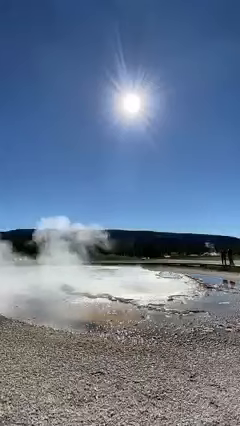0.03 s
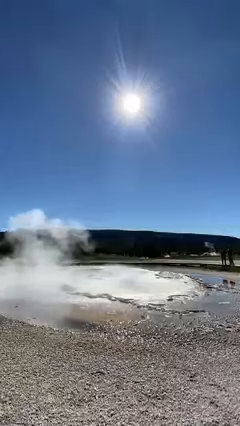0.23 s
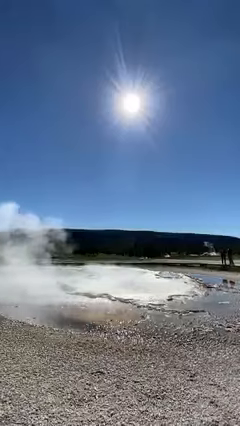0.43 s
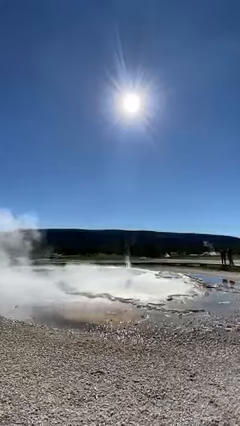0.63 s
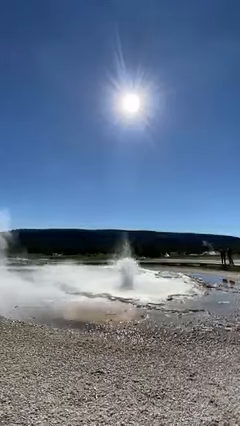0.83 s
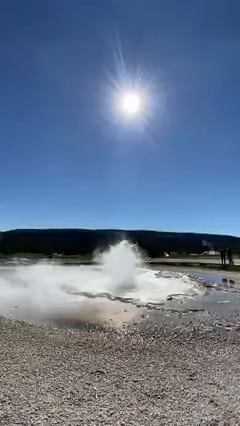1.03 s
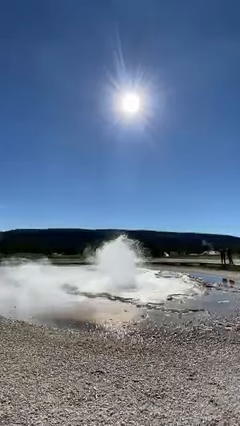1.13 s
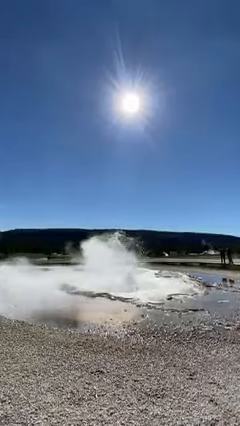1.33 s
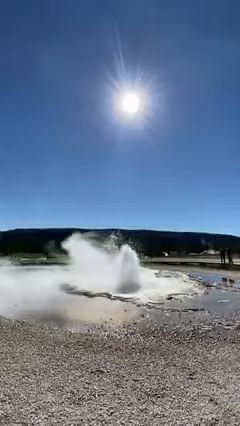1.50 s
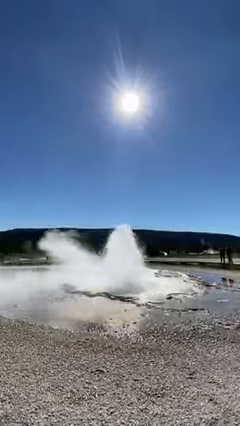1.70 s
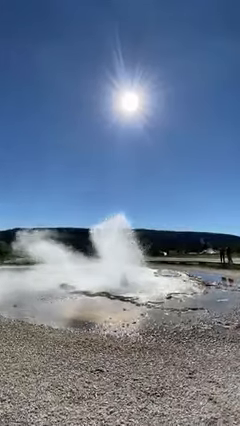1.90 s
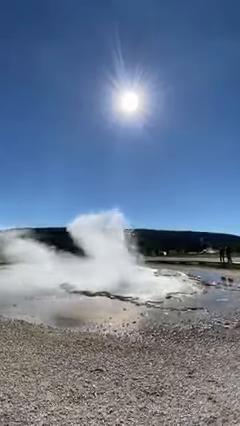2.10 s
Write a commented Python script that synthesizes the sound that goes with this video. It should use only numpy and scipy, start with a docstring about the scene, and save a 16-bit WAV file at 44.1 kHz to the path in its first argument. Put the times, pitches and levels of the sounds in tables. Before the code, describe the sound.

A small geyser erupts with splashing, hissing water while gusty wind buffets the microphone

```python
"""After a short silence the sound starts abruptly: gusty wind on the microphone ports, with a far hiss behind it.
The wind is lumpy low noise in three layers, with hard single buffets as short rings.
Across a shallow pool a small geyser erupts: noise for churn, falling water and spray, with ringing drops,
swells into splashing water; two near splashes are short rings.
Late on, the wind is at its strongest and whistles across the ports as a band of high noise."""
import sys
import numpy as np
from scipy import signal
from scipy.fft import rfft, irfft
from scipy.io import wavfile
from scipy.ndimage import uniform_filter1d

SR = 44100
rng = np.random.default_rng(int(sys.argv[2]) if len(sys.argv) > 2 else 0)


def transcribe(signal):
    """Save signal, clipped to [-1, 1], as a 16-bit WAV file at the path in sys.argv[1]."""
    frames = np.atleast_2d(signal).T
    limited = np.clip(frames, -1, 1)
    pcm = np.round(limited * 32767).astype(np.int16)
    wavfile.write(sys.argv[1], SR, pcm)


N = 94815
TIME_S = np.arange(N) / SR
WIND_TOP_HZ = 700   # top of the lumpy wind; bursts pitched below it sag


def from_db(db):
    """Decibels to an amplitude factor."""
    return 10 ** (np.asarray(db) / 20)


def rms_one(x):
    """Scale to an overall RMS of 1."""
    return x / np.sqrt(np.mean(x ** 2) + 1e-20)


def in_time(rows):
    """Each column after the first, drawn as straight lines over the times in the first."""
    s, *columns = np.transpose(rows)
    return [np.interp(TIME_S, s, column) for column in columns]


def band(x, low_hz, high_hz, order=2):
    """Butterworth band-pass."""
    return signal.sosfilt(signal.butter(order, [low_hz, high_hz], "band", fs=SR, output="sos"), x)


def noise_band(rows, low_hz, high_hz):
    """Independent rows of steep-sided band noise."""
    return band(rng.standard_normal((rows, N)), low_hz, high_hz, order=3)


def high_pass(corner_hz, order):
    """Sections of a Butterworth high-pass."""
    return signal.butter(order, corner_hz, "high", fs=SR, output="sos")


def drift(rate_hz):
    """Slow random wander of spread 1: noise through two equal low-pass poles at rate_hz."""
    step = 40   # samples between computed points
    r = np.exp(-2 * np.pi * rate_hz * step / SR)
    settle = 2000   # points dropped while the filter settles
    noise = rng.standard_normal(N // step + settle + 2)
    slow = signal.lfilter([1], [1, -2 * r, r * r], noise)[settle:]
    return np.interp(np.arange(N) / step, np.arange(len(slow)), rms_one(slow))


def evened(x, seconds):
    """Noise with its own slow swells taken out."""
    return x / np.sqrt(uniform_filter1d(x ** 2, size=int(seconds * SR)) + 1e-9)


def ring(clicks, hz, t60):
    """A two-pole resonator: a unit click starts a sine of height about 1 that falls 60 dB in t60 seconds."""
    r, w = from_db(-60 / (t60 * SR)), 2 * np.pi * hz / SR
    return signal.lfilter([0, np.sin(w)], [1, -2 * r * np.cos(w), r * r], clicks + 1e-18)


def bursts(rows, cycles):
    """Each event is one soft-edged ring of a few cycles, with a shorter snap of its octave; low ones sag."""
    sag_share = 0.1    # of the listed pitch, lost in each cycle
    snap_share = 0.17  # of the octave overtone
    out = np.zeros(N)
    for start_s, level_db, pitch_hz in rows:
        turns = (TIME_S - start_s) * pitch_hz
        shape = np.sin(np.pi * np.clip(turns / cycles, 0, 1)) ** 2
        sags = pitch_hz < WIND_TOP_HZ
        turns = turns * (1 - sag_share * (turns - cycles) / 2 * sags)
        tone = np.sin(2 * np.pi * turns)
        snap = snap_share * shape ** 2 * np.sin(4 * np.pi * turns)
        out += from_db(level_db) * shape * (tone + snap)
    return out


def eddies():
    """Turbulence alike in both ports: three layers of lumpy low noise."""
    # wind on the ports, before each layer's trim: time_s, thud_db, flutter_db, rasp_db
    gusts = [(0.15, -34, -41.5, -58), (0.25, -28.5, -30.5, -46.5), (0.43, -33.5, -37.5, -45.5),
             (0.475, -42, -44.5, -47), (0.52, -28.5, -30.5, -46), (0.545, -36, -39, -34),
             (0.58, -23, -38, -35), (0.63, -41.5, -59.5, -96), (0.69, -24.5, -27.5, -54),
             (0.75, -42.5, -53.5, -60), (0.79, -28, -40, -44), (0.96, -37, -37.5, -48),
             (1.06, -28.5, -27.5, -41.5), (1.12, -38.5, -51, -61), (1.26, -36, -35.5, -32.5),
             (1.36, -44.5, -52.5, -41), (1.39, -33.5, -37, -36), (1.48, -30, -32, -28.5),
             (1.55, -37, -43, -46), (1.6, -27, -33.5, -27.5), (1.65, -35.5, -36, -41.5),
             (1.74, -30, -24.5, -34), (1.78, -18.5, -30, -15.5), (1.82, -35, -22.5, -24),
             (1.86, -25, -26, -13), (1.88, -32, -27.5, -51), (1.91, -42.5, -51, -42),
             (2.15, -41, -50.5, -38.5)]
    # thud, flutter and rasp: low_hz, high_hz, lump_rate_hz, lump_depth_db, trim_db
    layers = [(39.6, 120.7, 84, 0, 1.8), (117, 300.6, 108, 5, 0.33), (312, 790, 186, 1.5, -6.5)]
    out = 0
    for level_db, (low_hz, high_hz, rate_hz, lump_db, trim_db) in zip(in_time(gusts), layers):
        lumps = noise_band(1, low_hz, high_hz)[0] * from_db(lump_db * drift(rate_hz))
        out = out + from_db(level_db + trim_db) * evened(lumps, 0.0518)
    out = signal.sosfilt(high_pass(37.6, order=2), out)
    return signal.sosfilt(signal.ellip(6, .5, 35, WIND_TOP_HZ, fs=SR, output="sos"), out)


def buffets():
    """The hardest single lumps of wind, each a short low ring in both ports."""
    # start_s, level_db, pitch_hz
    hits = [(.262, -12.5, 192), (.557, -18, 227), (.573, -9.5, 105.6), (.684, -17.5, 112.5),
            (1.056, -19.5, 110), (1.072, -15.5, 74), (1.186, -28, 62.5), (1.243, -25.5, 355),
            (1.257, -22.5, 338), (1.584, -16.5, 268), (1.609, -20.5, 367), (1.727, -13, 266),
            (1.752, -13, 234), (1.771, -14.5, 394), (1.788, -11.5, 428), (1.806, -6, 489),
            (1.833, -11.5, 555), (1.851, -11, 620), (1.856, -9.5, 125.2), (1.865, -10.5, 90)]
    return bursts(hits, cycles=2.5)


def wind_apart():
    """Lumpy noise from eddies too small to reach both ports alike."""
    # time_s, level_db
    levels = [(.15, -47.5), (.46, -51.5), (.56, -26), (.62, -53), (.7, -33.5), (.8, -58), (1.0, -43),
              (1.06, -30.5), (1.12, -52), (1.25, -90)]
    lumps = noise_band(1, 302, 760)[0] * from_db(-2.5 * drift(33))
    return from_db(in_time(levels)[0]) * rms_one(lumps)


def whistle():
    """Air blown across the ports: a band of high noise that swells with the strongest gust, alike and unlike."""
    center_hz, width_hz = 5170, 1680
    start_s, peak_s, end_s = 1.653, 1.8, 2.06
    peak_db, apart_db = -40.5, -0.5   # apart_db is relative to the part alike in both ports
    edge_db = peak_db - 22
    swell = [(start_s - .1, -90), (start_s, edge_db), (peak_s, peak_db), (end_s, edge_db), (end_s + .1, -90)]
    blown = from_db(in_time(swell)[0])
    noise = rng.standard_normal((2, N))
    alike, unlike = rms_one(band(noise, center_hz - width_hz / 2, center_hz + width_hz / 2))
    return blown * alike, blown * from_db(apart_db) * unlike


def wind():
    """Wind on both ports: the parts alike are added equally, the parts that differ with opposite sign."""
    whistle_alike, whistle_apart = whistle()
    alike = eddies() + buffets() + whistle_alike
    apart = wind_apart() + whistle_apart
    return alike + apart * [[1], [-1]]


def hiss(spectrum, patchy_db):
    """Third-octave bands of noise, each flickering; row 0 comes from the vent, rows 1-2 from all round."""
    hz, db = np.transpose(spectrum)
    edges = 250 * 2 ** np.arange(0, 6.5, 1 / 3)
    together = drift(60)   # flicker shared by all bands
    white = rng.standard_normal((2, 3, N))   # neighbouring bands use different noise
    out = 0
    for k, (low, high) in enumerate(zip(edges, edges[1:])):
        middle = np.log(low * high) / 2
        level_db = np.interp(middle, np.log(hz), db, left=-60, right=-60)
        flicker_db = patchy_db * (0.43 * together + drift(30))
        out = out + from_db(level_db + flicker_db) * band(white[k % 2], low, high)
    return rms_one(out)


def low_churn():
    """Water churning at the vent: lumpy noise in one low band."""
    return rms_one(noise_band(3, 620, 1204) * from_db(0.5 * drift(45)))


def falling_water():
    """Many small impacts merged into a patchy hiss."""
    # shape of the hiss: band_hz, relative_db (density per Hz)
    spectrum = [(900, -43), (1300, -16), (1700, -2.5), (2200, -17), (3000, -23), (4000, -25.5)]
    return hiss(spectrum, patchy_db=2)


def spray_and_steam():
    """The bright, less patchy hiss of steam and fine spray."""
    # shape of the hiss: band_hz, relative_db (density per Hz)
    spectrum = [(1800, -4), (2800, 5), (4500, -7.5), (5600, 5.5), (7000, 3.5), (8500, -1), (12000, -4.5),
                (16500, -15.5)]
    return hiss(spectrum, patchy_db=0.9)


def drops():
    """Falling drops ring a few cycles at pitches spread over nearly four octaves."""
    per_s, spread_db, cycles = 600, 3, 5.0   # the rate wanders around per_s
    pitches_hz = np.geomspace(700, 9000, 20)
    sizes = from_db(spread_db * np.minimum(rng.exponential(1, N), 5)) * rng.choice([-1, 1], N)
    born = rng.random(N) < per_s * from_db(3 * drift(8)) / SR
    dealt = rng.integers(0, len(pitches_hz), N)
    out = np.zeros(N)
    for k, hz in enumerate(pitches_hz):
        out += ring(sizes * born * (dealt == k), hz, cycles / hz)
    return rms_one(out)


def near_splashes():
    """Single splashes close by, each a short ring."""
    # start_s, level_db, pitch_hz
    plops = [(0.1933, -33, 1640), (1.7754, -32, 2020)]
    return bursts(plops, cycles=8.3)


def geyser():
    """Churn, water and spray follow the eruption; returns the sound from the vent and that from all round."""
    # levels before the trims below: time_s, churn_db, water_db, spray_db
    eruption = [(.155, -49, -52, -61), (.21, -47, -50.5, -57.5), (.33, -50.5, -59.5, -66.5),
                (.52, -53.5, -58, -62.5), (.63, -58, -62, -68), (.88, -47, -59, -61.5),
                (1.0, -58.5, -63.5, -66), (1.1, -80, -63.5, -67), (1.25, -64, -60, -62),
                (1.36, -47, -57.5, -61.5), (1.46, -37.5, -47.5, -52), (1.57, -45.5, -50, -51.5),
                (1.76, -44.5, -48, -50), (1.84, -49, -42, -44), (1.92, -43.5, -47.5, -47.5),
                (2.15, -42, -44.5, -47.5)]
    water_trim_db, spray_trim_db, drops_db = 6, 3.5, -8
    churn_db, water_db, spray_db = in_time(eruption)
    rows = from_db(churn_db) * low_churn()
    rows = rows + from_db(water_db + water_trim_db) * falling_water()
    rows = rows + from_db(spray_db + spray_trim_db) * spray_and_steam()
    direct = rows[0] + from_db(spray_db + drops_db) * drops()
    return direct, rows[1:]


def ports(direct, around):
    """The right port hears the vent a little later; the lows are folded to the centre."""
    # gain of the sound that arrives from all round: band_hz, gain_db
    diffuse = [(700, -2), (1700, -9), (3000, -2), (4600, 2), (7000, -15), (10000, -3), (15000, -2)]
    lag_s, mono_below_hz = 0.0002168, 1120
    hz, (at_hz, db) = np.fft.rfftfreq(N, 1 / SR), np.transpose(diffuse)
    late = irfft(rfft(direct) * np.exp(-2j * np.pi * hz * lag_s), N)
    room = irfft(rfft(around) * from_db(np.interp(hz, at_hz, db)), N)
    left, right = np.array([direct, late]) + room
    side = signal.sosfiltfilt(high_pass(mono_below_hz, order=4), (left - right) / 2)
    return (left + right) / 2 + side * [[1], [-1]]


def scene():
    """The geyser across the pool, near splashes, and wind on the ports."""
    direct, around = geyser()
    return ports(direct, around) + near_splashes() + wind()


def record(dry):
    """The recorder opens after a short silence; peaks are rounded, the top is cut."""
    start_s, fade_s, cutoff_hz = .150, .008, 15750
    opened = np.tanh(dry) * np.clip((TIME_S - start_s) / fade_s, 0, 1)
    return signal.sosfilt(signal.ellip(12, .5, 70, cutoff_hz, fs=SR, output="sos"), opened)


dry = scene()
out = record(dry)
transcribe(out)
```